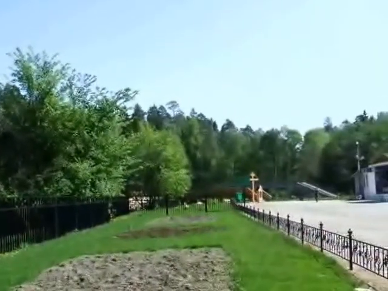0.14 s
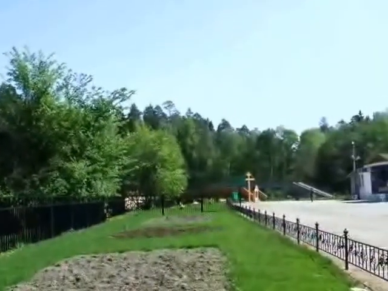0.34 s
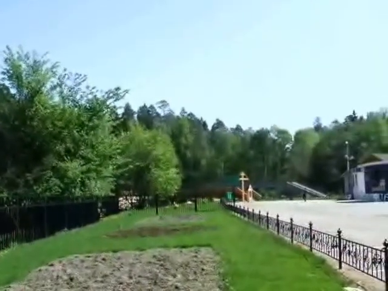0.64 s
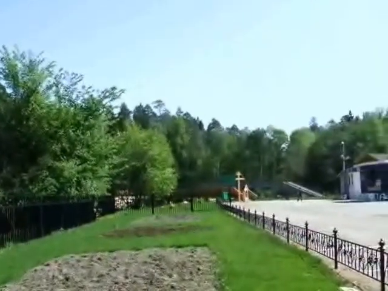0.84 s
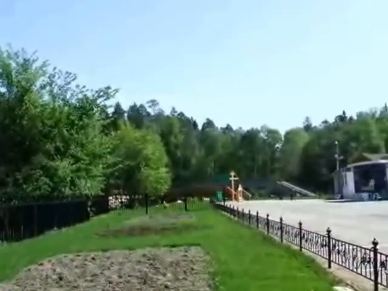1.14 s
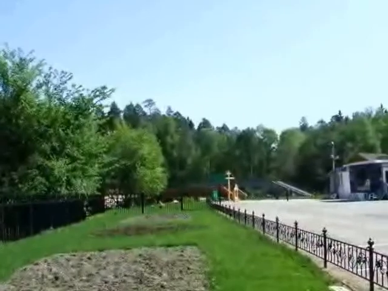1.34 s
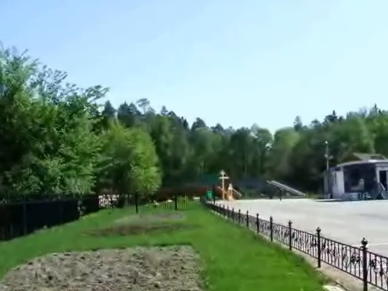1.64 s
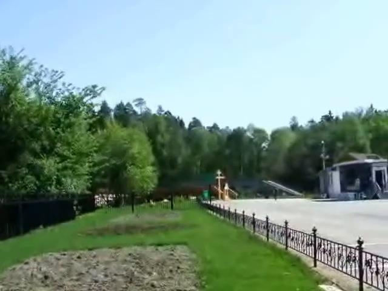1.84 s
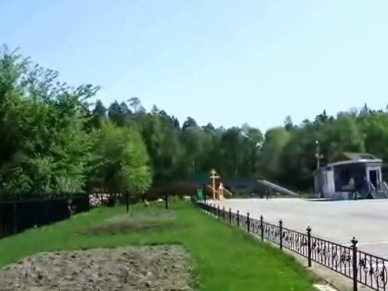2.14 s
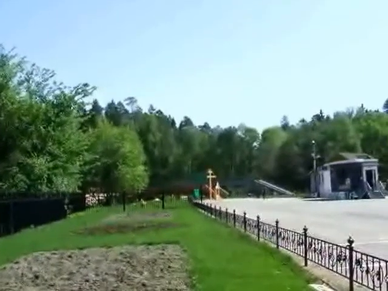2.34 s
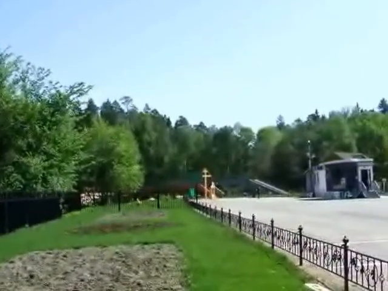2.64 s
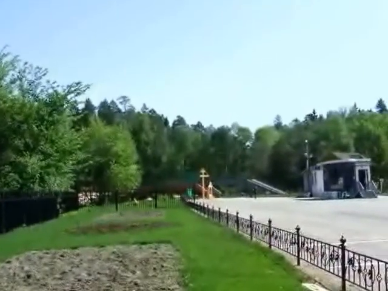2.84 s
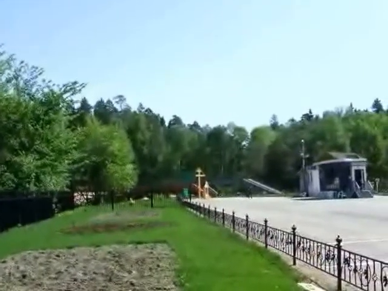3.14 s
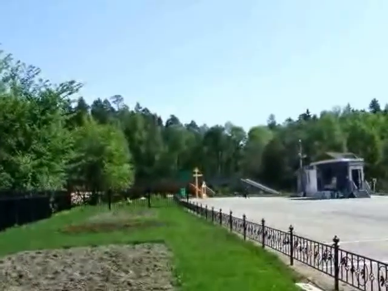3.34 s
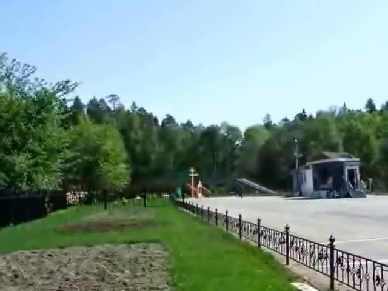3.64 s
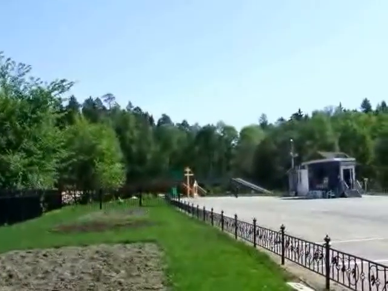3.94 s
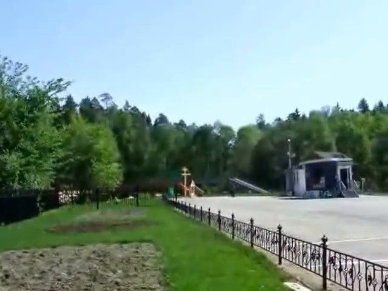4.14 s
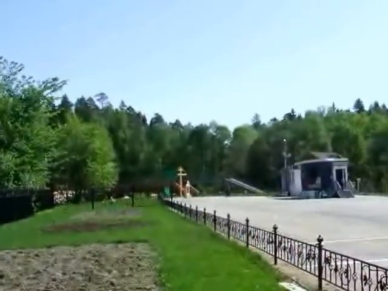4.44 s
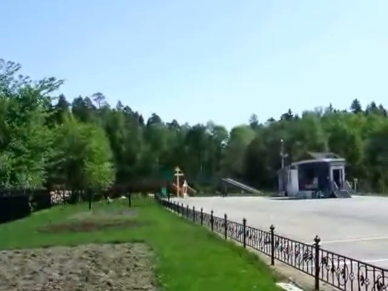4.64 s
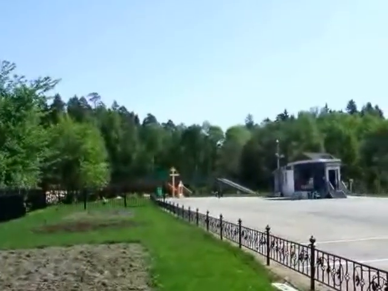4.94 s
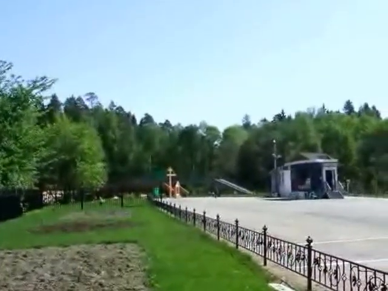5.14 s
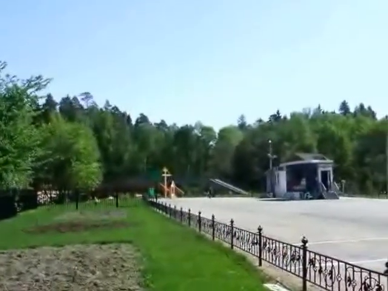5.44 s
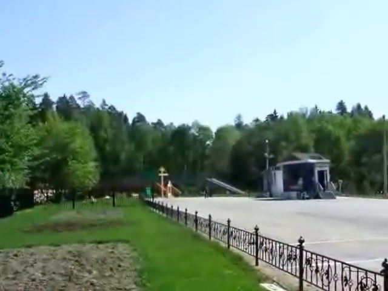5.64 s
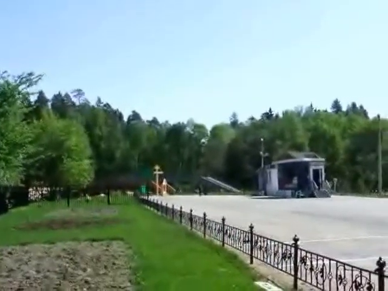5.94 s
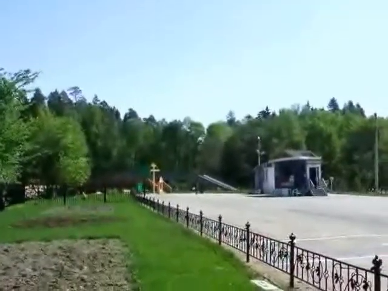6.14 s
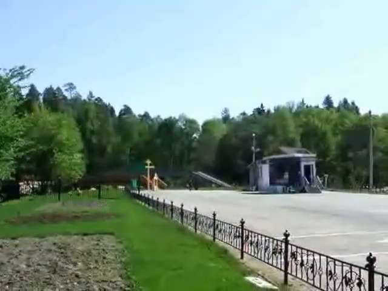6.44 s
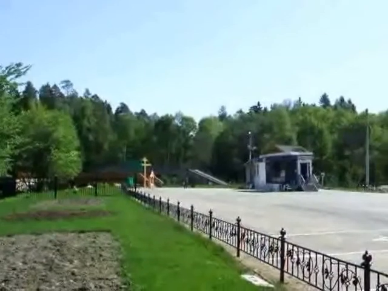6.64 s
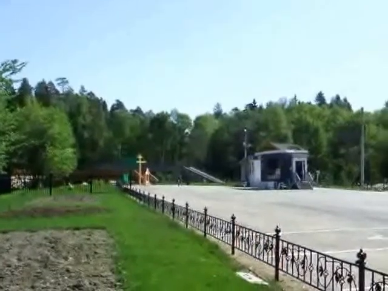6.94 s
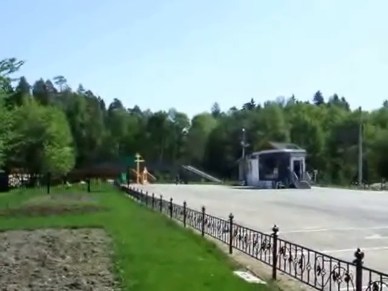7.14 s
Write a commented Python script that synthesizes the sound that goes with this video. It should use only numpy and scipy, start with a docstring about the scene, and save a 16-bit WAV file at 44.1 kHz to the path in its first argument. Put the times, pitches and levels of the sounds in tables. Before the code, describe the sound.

A nightingale sings varied whistles, chups and a dry rattle at a wooded park edge while wind gusts rumble and crackle on the microphone.

```python
"""At the edge of a park square a breeze gets up on the microphone and a nightingale sings doubled down-sweeps.
A thin high note and a far bird's chirps follow, then arched whistles with high answers, and gusts.
Long whistles end in flicks among low chups; a dry rattle, a second thin note and more arches close the song.
Birds are gliding tones with echoes from the wood; ticks add puffs of noise; wind and air are shaped noise."""
import sys
import numpy as np
from scipy import signal
from scipy.fft import rfft, irfft
from scipy.io import wavfile
from scipy.ndimage import uniform_filter1d, map_coordinates

SR = 44100
rng = np.random.default_rng(int(sys.argv[2]) if len(sys.argv) > 2 else 0)


def store_wav(level_fs):
    """Save 16-bit WAV to argv[1]."""
    pcm = np.round(np.clip(np.atleast_2d(level_fs), -1, 1) * 32767)
    wavfile.write(sys.argv[1], SR, pcm.T.astype(np.int16))


N = 321489
TIME = np.arange(N) / SR  # s


def gain_of(db):
    """Decibels to gain."""
    return 10 ** (np.asarray(db) / 20)


def evened(x):
    """Scales to rms 1."""
    return x / np.sqrt(np.mean(x ** 2) + 1e-20)


def read(points, hz):
    """Reads a frequency table on a log-frequency axis."""
    f, value = np.transpose(points)
    return np.interp(np.log(hz + 1), np.log(f + 1), value)


def add(mix, s, sound):
    """Mixes a sound in at s seconds."""
    part = mix[max(round(s * SR), 0):][:len(sound)]
    part += sound[:len(part)]


def noise(colour):
    """Noise of rms 1 whose spectrum follows (frequency [Hz], relative level [dB])."""
    gains = gain_of(read(colour, np.fft.rfftfreq(N, 1 / SR)))
    return evened(irfft(rfft(rng.standard_normal(N)) * gains, N))


def wander(rate_hz):
    """Smooth chance of rms 1, drawn through two random knots per cycle of the rate."""
    knots = rng.standard_normal(N)[:int(2 * rate_hz * N / SR) + 4]
    return evened(map_coordinates(knots, [TIME * 2 * rate_hz], mode="nearest"))


def tone(hz):
    """A sine that follows a pitch path."""
    return np.sin(2 * np.pi * np.cumsum(hz) / SR)


def glide(first_hz, last_hz, length_s, bend):
    """A pitch slide that settles toward its end (bend > 0) or gathers speed (bend < 0)."""
    u = np.linspace(0, 1, int(length_s * SR))
    return first_hz + (last_hz - first_hz) * np.expm1(-bend * u) / np.expm1(-bend)


def note(hz, attack_s, release_s, sag_db, overtone_db, waver):
    """The syrinx sings a nearly pure tone along a pitch path: attack, a sagging or swelling hold, release."""
    t = np.arange(len(hz)) / SR
    edges = np.clip(np.minimum(t / attack_s, (t[-1] - t) / release_s), 0, 1)
    swell = edges * gain_of(sag_db * t / t[-1])
    unsteady = map_coordinates(rng.standard_normal(128), [t * 500], mode="nearest")
    phase = 2 * np.pi * np.cumsum(hz * (1 + waver * unsteady)) / SR
    overtone = gain_of(overtone_db) * np.minimum(hz / 2600, 1) ** 6  # fades on the lowest pitches
    return np.sqrt(2) * swell * (np.sin(phase) + overtone * np.sin(2 * phase))


def air(hum_hz, hum_db):
    """The steady outdoor hush, with a faint far-off hum of unsteady pitch."""
    # Spectrum of the hush: (frequency [Hz], relative level [dB])
    hush_colour = [(50, -10.5), (110, -11.5), (243, -4.5), (600, -6.5), (1500, -11), (2870, -8),
                   (4640, -14), (7300, -11), (7950, -7), (8500, -39)]
    hum = tone(hum_hz * (1 + 0.021 * wander(7.8)))
    return gain_of(-49) * noise(hush_colour) + gain_of(hum_db) * hum


def breeze():
    """Strength of the breeze: it gets up, freshens slowly, then drops."""
    up_s, drop_s = 0.32, 6.08
    rise_db_per_s, freshen_db_per_s, drop_db_per_s = 39, 1.64, 25.5
    db = -44.5 + freshen_db_per_s * TIME
    db -= rise_db_per_s * np.maximum(up_s - TIME, 0)
    db -= drop_db_per_s * np.maximum(TIME - drop_s, 0)
    return gain_of(db)


def wind(lump_db, lump_hz, crackle_db, crackle_growth, crackle_lump_db, buffet_db, breeze_db,
         rumble_db, rumble_growth, edge_s):
    """Eddies thump the microphone in lumps; the harder the gust, the more it crackles and rumbles."""
    # Gusts that strike the microphone: (time [s], length [s], relative level at the strike [dB])
    gust_rows = [(1.233, .14, -31), (1.487, 0.14, -37.5), (1.678, 0.3, -34), (2.006, 0.16, -32.5),
                 (2.233, 0.38, -30.5), (2.418, 0.033, -23), (2.656, 0.096, -23), (2.83, 0.13, -25),
                 (3.523, 0.088, -37.5), (3.697, 0.41, -35.5), (4.346, 0.026, -33), (4.572, 0.214, -33),
                 (4.67, 0.026, -21.5), (4.887, 0.45, -39), (5.401, .43, -28), (5.869, .1, -26),
                 (5.988, .37, -36.5)]
    # Spectrum of the buffeting: (frequency [Hz], relative level [dB])
    buffet_colour = [(25, -16.5), (110, 3.5), (260, 0.5), (660, -12.5), (1500, -39.5), (3000, -74.5)]
    # Spectrum of the lowest eddies: (frequency [Hz], relative level [dB])
    rumble_colour = [(10, -6), (30, -2), (65, -2.5), (130, -9.5), (260, -21), (700, -43.5), (2000, -82)]
    slacken_db_per_s = 15.5

    power = (gain_of(breeze_db) * breeze()) ** 2
    for s, length, db in gust_rows:
        inside = np.minimum(TIME - s, s + length - TIME)
        slackening = gain_of(db - slacken_db_per_s * np.maximum(TIME - s, 0))
        power += (slackening * np.clip(.5 + inside / edge_s, 0, 1)) ** 2
    force = np.sqrt(power)
    hardness = force / force.max()

    eddies = np.tanh(wander(lump_hz))
    lumps = evened(gain_of(lump_db * eddies))
    buffet = noise(buffet_colour) * lumps * force * gain_of(buffet_db)

    crackle = noise([(200, -22), (600, 10), (1200, -3), (2000, -18.5), (4000, -31), (8000, -41.5)])
    crackle *= evened(gain_of(crackle_lump_db * np.tanh((eddies + wander(160)) / 2)))
    crackle *= gain_of(crackle_db) * force * hardness ** crackle_growth

    lingering = uniform_filter1d(hardness, size=5000)  # the lowest eddies follow the gust slowly
    rumble_force = np.hypot(breeze(), gain_of(rumble_db) * lingering ** rumble_growth)
    rumble = rumble_force * noise(rumble_colour)
    return buffet + crackle + rumble


def slaps(length_s):
    """An eddy bursts right on the microphone port: a few milliseconds of rough pressure."""
    # Sharp slaps of air during gusts: (time of the middle [s], level [dB])
    slap_rows = [(2.702, -14.5), (2.729, -17), (2.897, -19.5), (4.674, -29), (4.689, -26), (5.92, -25.5)]
    bursts = np.zeros(N)
    for s, db in slap_rows:
        add(bursts, s - length_s / 2, gain_of(db) * np.hanning(int(length_s * SR)))
    return bursts * noise([(150, 1.5), (500, -9), (1400, -6.5), (2400, -23.5), (6000, -56.0)])


def faint_ticks(level_db, per_s):
    """Tiny dry clicks at chance moments, more often while the breeze is up."""
    clicks = (rng.random(N) < per_s / SR * evened(breeze())) * rng.random(N)
    puffs = signal.oaconvolve(clicks, np.hanning(SR // 200))[:N]
    return gain_of(level_db) * puffs * noise([(2000, -25), (3800, -2.0)])


def wood(x, near_db, near_t60, far_db):
    """Nearby branches scatter a quick cluster of echoes; the wood behind adds a long thin tail."""
    # Time for the far echoes to die by 60 dB: (frequency [Hz], decay time [s])
    far_t60 = [(1000, 0.4), (2600, 0.93), (4500, 0.85), (7500, 0.36)]
    t = np.arange(SR) / SR
    # sparse echoes of either sign, about 2500 a second
    near, far = rng.choice([-1., 1.], (2, SR)) * (rng.random((2, SR)) < 2500 / SR)
    near = near * gain_of(-60 * t / near_t60) * (t > .003)
    # the far tail builds up, then each frequency decays at its own pace
    hz, frame_s, z = signal.stft(far * np.minimum(t / 0.026, 1), SR, nperseg=256)
    decay = gain_of(-60 * frame_s / read(far_t60, hz)[:, None])
    far = signal.istft(z * decay, SR, nperseg=256)[1][:SR]
    echoes = gain_of(near_db) * near / np.linalg.norm(near)
    echoes += gain_of(far_db) * far / np.linalg.norm(far)
    return signal.fftconvolve(x, echoes)[:N]


def chorus(level_db, low_hz, high_hz, glide_hz, count):
    """The most distant birds: short glides at chance moments that blur into the wood."""
    out = np.zeros(N)
    for when, pitch, slope, length in rng.random((count, 4)):
        size = int((1 + 2 * length) * .04 * SR)
        middle_hz = low_hz + pitch * (high_hz - low_hz)
        hz = middle_hz + (slope - .5) * glide_hz * np.linspace(-1, 1, size)
        add(out, when * N / SR, np.hanning(size) * tone(hz))
    return gain_of(level_db) * out


def far_birds(waver, level_db):
    """Birds deeper in the wood: plain gliding whistles with a slight quaver."""
    # Their clearest whistles: (time [s], length [s], first pitch [Hz], last pitch [Hz], relative level [dB])
    far_rows = [(0, 0.074, 6720, 6670, -40.5), (0.361, .09, 4400, 4260, -48.5),
                (1.868, .07, 5330, 5830, -45), (4.016, 0.087, 4250, 4175, -34.5),
                (4.523, 0.054, 4570, 3720, -36.5), (4.684, 0.042, 3420, 3890, -37),
                (4.844, 0.12, 4590, 4570, -39.5), (4.913, 0.058, 3170, 2745, -37.5),
                (5.111, 0.17, 3690, 3390, -39), (5.316, 0.08, 2750, 3126, -36.5),
                (5.51, .11, 3150, 3590, -40), (5.743, 0.064, 4170, 2580, -38),
                (5.92, 0.07, 2665, 3000, -36.5), (6.047, .084, 2574, 2400, -45.5),
                (6.443, 0.11, 4430, 3100, -48.5), (7.12, .1, 4290, 4160, -48.5)]
    out, quaver = np.zeros(N), 1 + waver * wander(90)
    for s, length, first_hz, last_hz, db in far_rows:
        size = int(length * SR)
        hz = np.linspace(first_hz, last_hz, size) * np.roll(quaver, -int(s * SR))[:size]
        add(out, s, gain_of(db) * signal.windows.tukey(size, .5) * tone(hz))
    return gain_of(level_db) * out


def far_chirps(count):
    """One far bird repeats a small arched chirp in an even run, each rising and falling away."""
    start_s, step_s, top_hz, level_db = 1.365, .119, 4180, -48.5
    out = np.zeros(N)
    up = glide(first_hz=3620, last_hz=top_hz, length_s=0.024, bend=.4)
    down = glide(first_hz=top_hz, last_hz=3170, length_s=0.037, bend=2.5)
    for k in range(count):
        chirp = note(np.r_[up, down], attack_s=.008, release_s=0.01,
                     sag_db=-1.5, overtone_db=-43, waver=0.0083)
        add(out, start_s + k * step_s, gain_of(level_db) * chirp)
    return out


def ticks(rows, sweep_db, rasp_db, rasp_s):
    """Each tick is a very fast down-sweep inside a puff of rasping noise."""
    sweeps, puffs = np.zeros((2, N))
    hz = glide(first_hz=8140, last_hz=6120, length_s=.0036, bend=1.1)
    for s, db in rows:
        sweep = note(hz, attack_s=0.0033, release_s=0.00079, sag_db=1.0, overtone_db=-55, waver=0.045)
        add(sweeps, s, gain_of(db) * sweep)
        add(puffs, s - .001, gain_of(db) * np.hanning(int(rasp_s * SR)))
    rasp = noise([(2800, -14), (3900, 1.0), (5500, 1.5), (7800, 2), (9500, -29.0)])
    return gain_of(sweep_db) * sweeps + gain_of(rasp_db) * puffs * rasp


def chews():
    """Each syllable is two down-sweeps: the first levels out, the second drops away."""
    # Doubled down-sweeps, sung in pairs: (time [s], level [dB])
    chew_rows = [(.146, -21.5), (0.2558, -20.5), (0.4404, -18.5), (0.5494, -19), (0.7202, -18),
                 (.832, -19.5), (1.0031, -20), (1.1089, -19.5)]
    out = np.zeros(N)
    levelling = glide(first_hz=3420, last_hz=2002, length_s=0.024, bend=2.45)
    dropping = glide(first_hz=3023, last_hz=1517, length_s=.022, bend=-0.72)
    for s, db in chew_rows:
        first = note(levelling, attack_s=0.0031, release_s=0.0027,
                     sag_db=-3.5, overtone_db=-25.5, waver=0.014)
        second = note(dropping, attack_s=0.0043, release_s=0.0052,
                      sag_db=-3.5, overtone_db=-24.0, waver=0.016)
        add(out, s, gain_of(db) * first)
        add(out, s + .031, gain_of(db) * second)
    return out


def pips():
    """A thin high note lifts softly, then sounds out as it sinks."""
    # Thin high notes: (time [s], level of the sinking part [dB], top pitch [Hz], last pitch [Hz])
    pip_rows = [(1.275, -19.5, 8060, 7430), (6.393, -24.5, 8080, 7830)]
    out = np.zeros(N)
    for s, db, top_hz, last_hz in pip_rows:
        up = glide(first_hz=7100, last_hz=top_hz, length_s=0.0143, bend=1.0)
        down = glide(first_hz=top_hz, last_hz=last_hz, length_s=0.0301, bend=2.5)
        lift = note(up, attack_s=0.014, release_s=.0015, sag_db=-1.5, overtone_db=-45, waver=.008)
        sink = note(down, attack_s=0.0056, release_s=.014, sag_db=-1.0, overtone_db=-45, waver=0.013)
        add(out, s, gain_of(db) * np.r_[gain_of(-7) * lift, sink])
    return out


def arches():
    """A whistle scoops in, climbs to its top pitch and tips over."""
    # Arched whistles: (time [s], level [dB], top pitch [Hz])
    arch_rows = [(1.771, -29, 4560), (2.261, -24, 4570), (2.691, -21.5, 4520), (6.777, -24, 4800),
                 (7.238, -23.5, 4470)]
    out = np.zeros(N)
    knee_hz = 2950
    scoop = glide(first_hz=2200, last_hz=knee_hz, length_s=0.0077, bend=.6)
    for s, db, top_hz in arch_rows:
        up = glide(first_hz=knee_hz, last_hz=top_hz, length_s=.042, bend=.4)
        down = glide(first_hz=top_hz, last_hz=2444, length_s=.03, bend=-3.0)
        arch = note(np.r_[scoop, up, down], attack_s=.016, release_s=0.0042,
                    sag_db=-4, overtone_db=-34.5, waver=0.0035)
        add(out, s, gain_of(db) * arch)
    return out


def seets():
    """A high note swoops up, breaks off and plunges."""
    # High answers to the arches: (time [s], level [dB])
    seet_rows = [(2.068, -35), (2.512, -22), (2.935, -23), (7.04, -26.5)]
    out = np.zeros(N)
    up = glide(first_hz=6210, last_hz=7900, length_s=0.032, bend=-3.2)
    down = glide(first_hz=8070, last_hz=4750, length_s=.012, bend=0.22)
    for s, db in seet_rows:
        swoop = note(up, attack_s=0.029, release_s=0.013, sag_db=5, overtone_db=-37, waver=.003)
        plunge = note(down, attack_s=0.0025, release_s=0.0023, sag_db=-3.0, overtone_db=-18, waver=.003)
        add(out, s, gain_of(db) * swoop)
        add(out, s + .04, gain_of(db) * plunge)
    return out


def whistles():
    """A long whistle scoops up to its pitch, then eases down and fades."""
    # Long whistles: (time [s], level [dB], top pitch [Hz], last pitch [Hz])
    whistle_rows = [(3.17, -22.5, 3073, 2613), (3.814, -20.5, 2705, 2453), (4.417, -20.5, 2830, 2506)]
    out = np.zeros(N)
    for s, db, top_hz, last_hz in whistle_rows:
        scoop = top_hz * glide(first_hz=.88, last_hz=0.94, length_s=.008, bend=2.6)  # fractions of the top
        ease = glide(first_hz=top_hz, last_hz=last_hz, length_s=0.0914, bend=3.3)
        whistle = note(np.r_[scoop, ease], attack_s=0.015, release_s=0.012,
                       sag_db=-9, overtone_db=-31.5, waver=.004)
        add(out, s, gain_of(db) * whistle)
    return out


def flicks():
    """A steep down-sweep that levels out at its foot."""
    # The flick that closes each long whistle: (time [s], level [dB])
    flick_rows = [(3.302, -25.5), (3.954, -25), (4.56, -26)]
    out = np.zeros(N)
    hz = glide(first_hz=6730, last_hz=3025, length_s=.019, bend=3.9)
    for s, db in flick_rows:
        flick = note(hz, attack_s=0.0039, release_s=0.0075, sag_db=-2.0, overtone_db=-25.0, waver=0.007)
        add(out, s, gain_of(db) * flick)
    return out


def chups():
    """A low, quickly dying down-sweep and its soft repeat."""
    # Low chups: (time [s], level [dB])
    chup_rows = [(4.19, -21), (4.804, -20.5), (5.03, -17.5), (5.284, -18)]
    repeat_after_s, repeat_db = .151, -11
    out = np.zeros(N)
    hz = glide(first_hz=2680, last_hz=1145, length_s=0.0209, bend=2.01)
    for s, db in chup_rows:
        for after_s, softer_db in ((0, 0), (repeat_after_s, repeat_db)):
            chup = note(hz, attack_s=0.0056, release_s=0.0078, sag_db=-34.5, overtone_db=-29, waver=0.011)
            add(out, s + after_s, gain_of(db + softer_db) * chup)
    return out


def rattle():
    """A stutter, then an even run of about thirty ticks a second."""
    # The stuttering ticks that open it: (time [s], relative level [dB])
    stutter_rows = [(5.463, -23), (5.47, -25), (5.478, -18.5), (5.486, -20), (5.517, -31), (5.528, -22)]
    # Course of loudness over the even run: (time [s], relative level [dB])
    run_levels = [(5.55, -28), (5.69, -28.5), (5.82, -22.5), (6.05, -21), (6.3, -22.5)]
    start_s, step_s = 5.553, .03207
    times = np.arange(start_s, run_levels[-1][0], step_s)
    run = list(zip(times, np.interp(times, *np.transpose(run_levels))))
    return ticks(list(stutter_rows) + run, sweep_db=-0.5, rasp_db=-9.0, rasp_s=0.0051)


def scene():
    """The near singer and the far birds, each with its echoes from the wood, then wind and air."""
    # Dry, raspy ticks between the notes: (time [s], relative level [dB])
    tick_rows = [(.963, -26), (1.639, -29.5), (2.286, -22.5), (3.0, -23), (3.892, -21.5), (4.867, -22),
                 (7.057, -22)]
    low = chews() + chups() + arches() + whistles()
    high = seets() + pips() + flicks()
    run = rattle()
    dry_ticks = ticks(tick_rows, sweep_db=-24.5, rasp_db=-1.5, rasp_s=0.0087)
    dry_ticks += faint_ticks(level_db=-32, per_s=9.1)
    far = far_birds(waver=0.013, level_db=-3.0)
    far += chorus(level_db=-51.5, low_hz=2564, high_hz=5440, glide_hz=790, count=44)

    birds = low + wood(low, near_db=-4.5, near_t60=0.069, far_db=-15.0)
    # the high notes' near echoes are softer but linger longer
    birds += high + wood(high, near_db=-7.5, near_t60=0.18, far_db=-14.5)
    to_wood = run + gain_of(-6.0) * dry_ticks
    birds += run + dry_ticks + wood(to_wood, near_db=-7.5, near_t60=0.11, far_db=-11.5)
    birds += far + wood(far, near_db=-2.5, near_t60=0.25, far_db=-4.5)
    chirps = far_chirps(count=4)
    birds += chirps + wood(chirps, near_db=-12, near_t60=.12, far_db=-17)

    gusts = wind(lump_db=6.5, lump_hz=35.42, crackle_db=-4, crackle_growth=0.53, crackle_lump_db=19.5,
                 buffet_db=2.5, breeze_db=-12.0, rumble_db=-28.5, rumble_growth=0.62, edge_s=0.02)
    return (birds + gusts + slaps(length_s=0.0055) + air(hum_hz=167.7, hum_db=-55.5))[None]


def record(dry):
    """The small camera's band limit: a steep low-pass takes off the top treble."""
    edge_hz = 8350
    low_pass = signal.firwin(301, edge_hz, window=("kaiser", 7), fs=SR)
    return signal.oaconvolve(dry, low_pass[None], "same")


dry = scene()
out = record(dry)
store_wav(out)
```